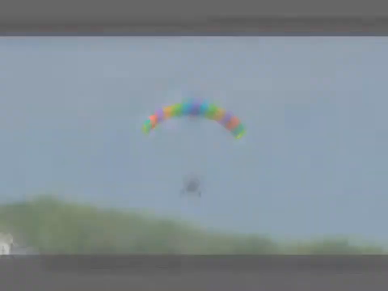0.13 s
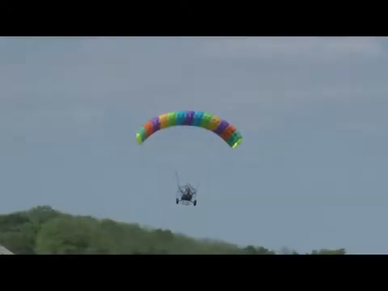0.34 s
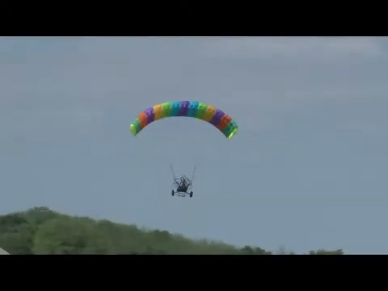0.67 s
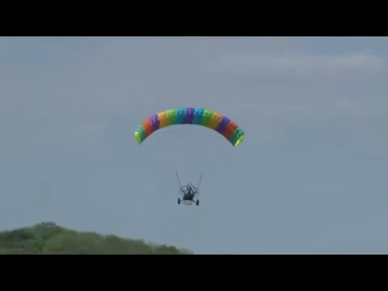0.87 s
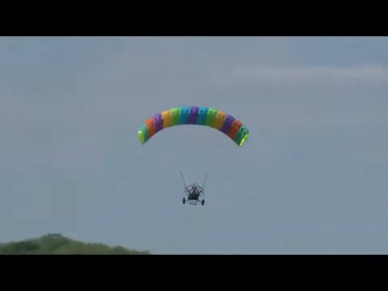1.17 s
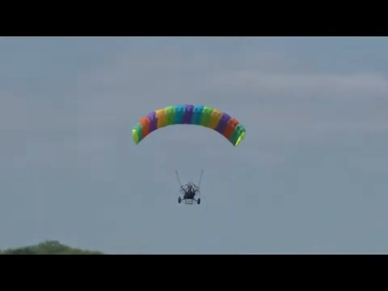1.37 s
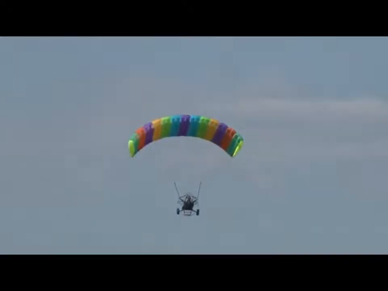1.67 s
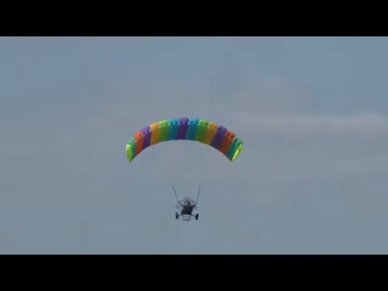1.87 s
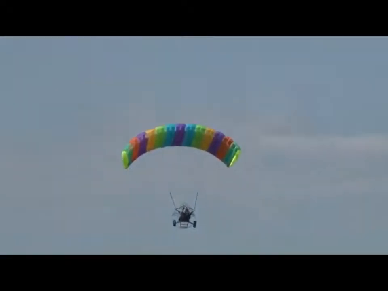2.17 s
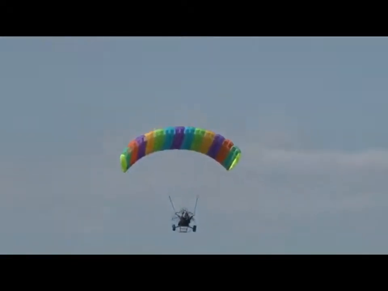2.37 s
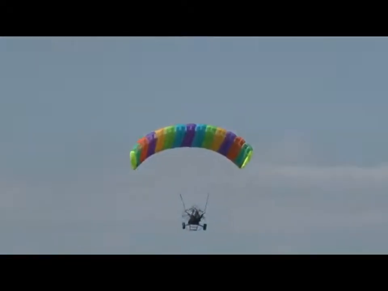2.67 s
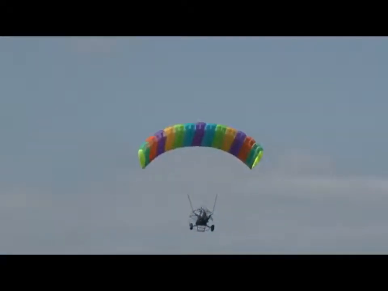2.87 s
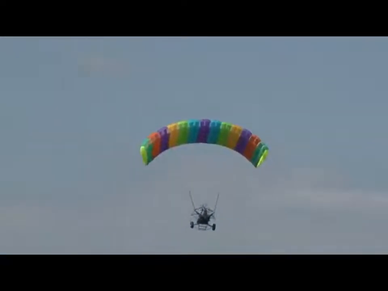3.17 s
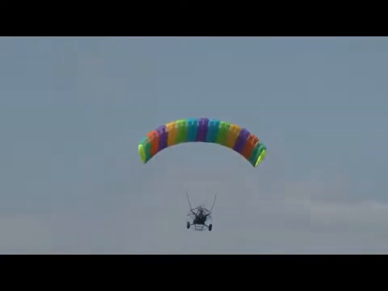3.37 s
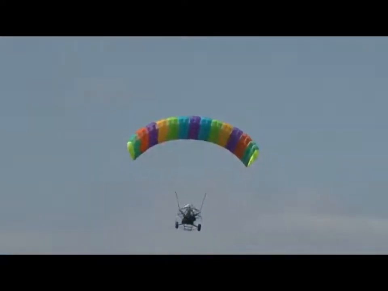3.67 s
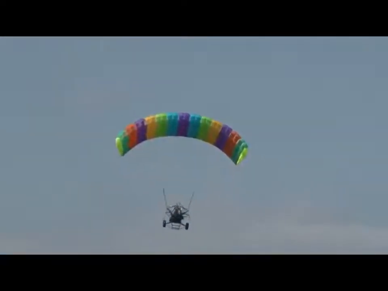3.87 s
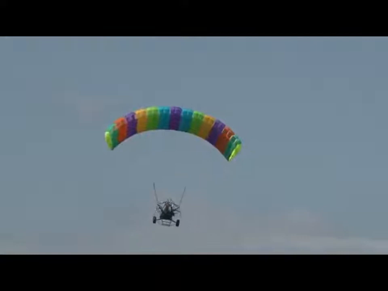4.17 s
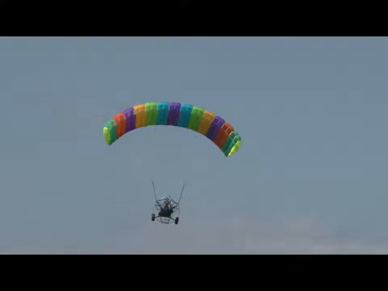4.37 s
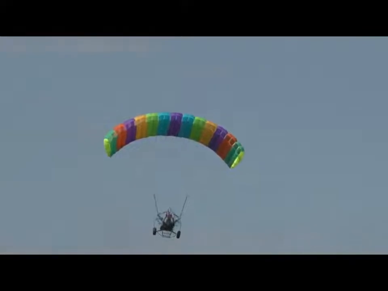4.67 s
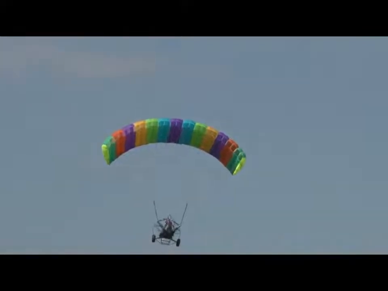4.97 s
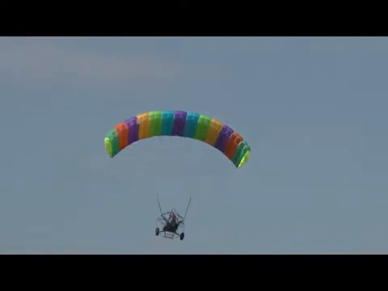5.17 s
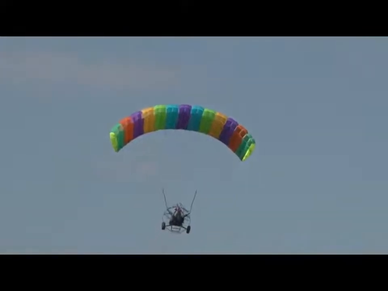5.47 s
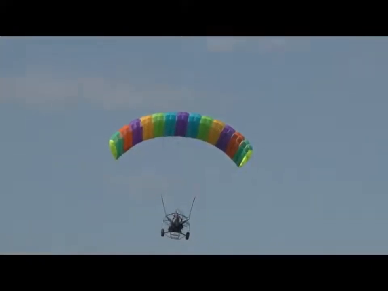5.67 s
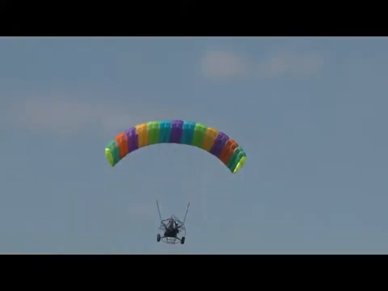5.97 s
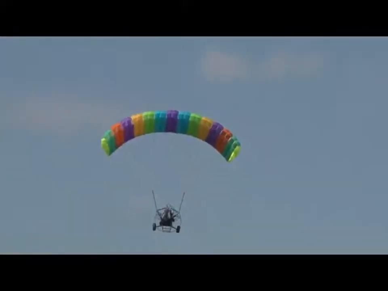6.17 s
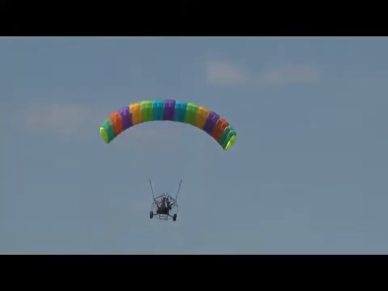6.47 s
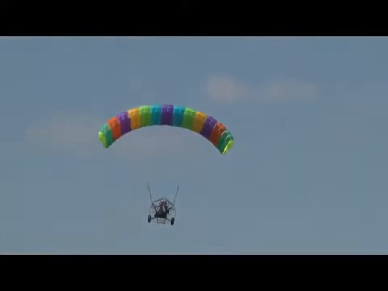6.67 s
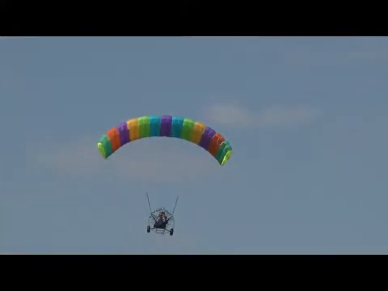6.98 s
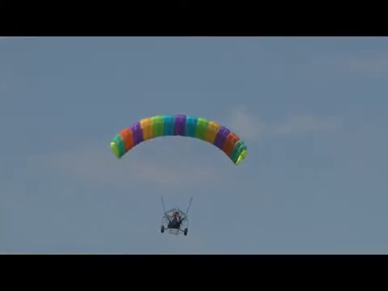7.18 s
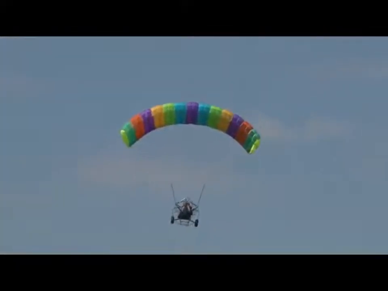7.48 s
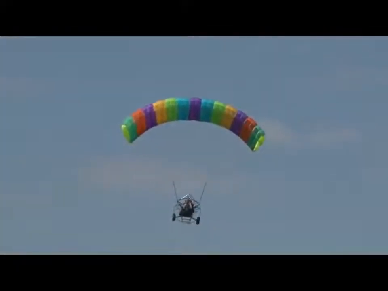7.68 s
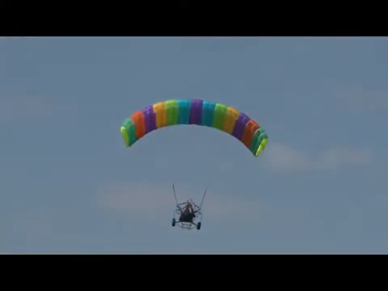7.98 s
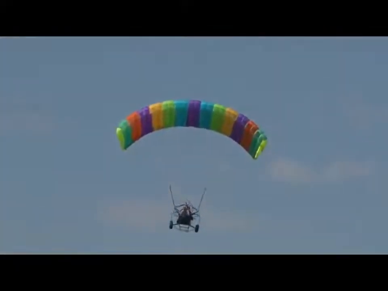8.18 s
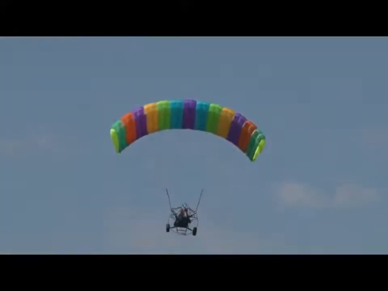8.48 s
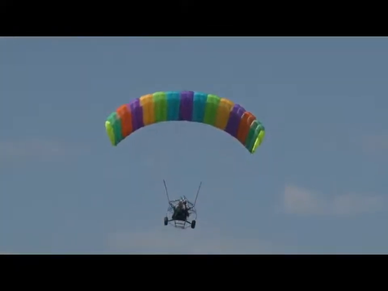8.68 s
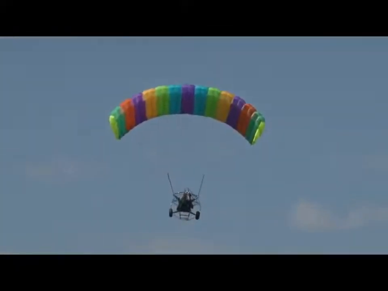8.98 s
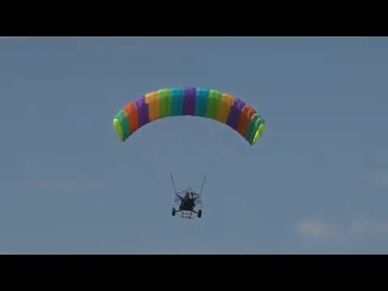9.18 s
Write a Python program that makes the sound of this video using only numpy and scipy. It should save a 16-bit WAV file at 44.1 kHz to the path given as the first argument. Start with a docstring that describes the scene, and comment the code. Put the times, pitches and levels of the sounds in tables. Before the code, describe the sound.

Outdoors, a small aircraft engine and propeller buzz continuously, moderate at first and then fuller as the machine climbs toward the listener. The pitch barely changes, while a raspy rush of air swells and shifts in tone. Four very short, sharp clicks stand out of the drone, the first two close together. A soft wind rumble touches the microphone now and then, mostly on the left.

```python
"""On an open airfield, a powered parachute drones towards the listener and climbs slowly overhead.
Its two-stroke engine radiates harmonics of the firing rate through the exhaust and barks at each firing;
a geared pusher propeller adds blade-passing tones and a rough rush of shed vortices.
Close reflections interfere with the rush in a comb that sinks as the craft rises.
Light gusts rumble on the microphone, and four sharp cracks stand out of the drone."""
import sys
import numpy as np
from scipy import signal
from scipy.fft import rfft, irfft
from scipy.io import wavfile

SR = 44100
rng = np.random.default_rng(int(sys.argv[2]) if len(sys.argv) > 2 else 0)


def master_out(mix):
    """Clip the mix to full scale and print it as 16-bit PCM to the path in sys.argv[1]."""
    frames = np.transpose(np.atleast_2d(mix))
    ceiling = np.clip(frames, -1, 1)
    pcm = np.round(ceiling * 32767).astype(np.int16)
    wavfile.write(sys.argv[1], SR, pcm)


N = 411894
TIME = np.arange(N) / SR
BIN_HZ = np.arange(N // 2 + 1) * SR / N

# firing rate as heard (t/s, f/Hz)
FIRING_RATE = [(0, 130.95), (1.64, 131.0), (2.28, 130.5), (3.08, 129.6), (3.8, 129.12), (4.6, 129.25),
               (6.0, 128.95), (7.2, 129.12), (8.6, 129.8), (9.33, 129.55)]
# level of the propeller tones and lower rush: a quick fade-in, then slow, wavering growth (t/s, gain/dB)
GROWTH = [(0, -11), (.45, -2.5), (1.4, -4), (2.2, -1.5), (3, 0), (4.2, 0.2), (5.4, 0.6), (6.5, 3), (7.4, 3),
          (8.2, 0.5), (9.34, 4)]
# exhaust harmonics 3 to 6 (t/s, relative level/dB)
THIRD_ORDER = [(0.0, -47), (1.53, -48.5), (2.08, -33.5), (2.96, -37), (6.66, -25.5), (7.2, -35),
               (7.44, -31.5), (8.35, -34.5), (9.26, -26.5), (9.34, -37.5)]
FOURTH_ORDER = [(0.0, -40), (0.02, -44), (0.75, -31), (1.48, -33), (1.92, -51), (2.52, -29), (4.08, -22.5),
                (4.97, -34), (5.36, -22.5), (5.82, -20), (6.68, -26.5), (7.88, -20.5), (8.97, -32),
                (9.24, -30), (9.34, -36.5)]
FIFTH_ORDER = [(0.0, -34), (0.44, -28.5), (1.43, -24.5), (2.11, -32), (2.52, -23), (2.99, -23.5),
               (4.21, -16.5), (4.73, -20.5), (5.46, -17.5), (6.71, -18.5), (7.26, -39), (8.61, -30),
               (8.97, -37), (9.34, -28)]
SIXTH_ORDER = [(0.0, -51.5), (0.28, -40.5), (1.48, -42), (2.36, -32.5), (2.78, -42), (3.87, -29.5),
               (4.03, -41.5), (4.27, -27), (4.95, -28), (5.88, -49), (6.61, -31), (7.62, -37.5),
               (7.7, -26.5), (8.3, -40), (8.61, -27), (9.34, -26.5)]
# radiation lobes of the other exhaust harmonics (firing order, level/dB, peak t/s, half-width/s)
EXHAUST_LOBES = [(1, -44, 1.1, 1.1), (1, -42.5, 3.45, 0.41), (1, -44.5, 6.4, 1.6), (2, -47.5, 1.1, 0.62),
                 (2, -39, 3.5, 0.29), (2, -32, 8.3, 2.26), (7, -38, 0.91, 2.7), (7, -25, 3.64, 0.52),
                 (7, -32, 5.9, 1.2), (7, -19.5, 6.75, 0.042), (7, -32, 8.5, 1.9), (8, -39, 1.3, 1.4),
                 (8, -28.5, 4.1, 0.5), (8, -28.5, 5.9, .7), (9, -35, 0.71, 1), (9, -36.5, 3.9, 0.66),
                 (9, -43, 8.2, 0.3), (9, -37, 11, .6), (10, -31.5, 2.7, .3), (10, -28, 3.5, 0.43),
                 (10, -34, 8.55, .35), (11, -37, 0.92, .7), (11, -35, 2.2, 0.72), (11, -36.5, 3.6, 0.63),
                 (11, -34, 6, 1.8), (11, -31.5, 8.15, .25), (12, -31, 4.65, 0.3), (12, -27.5, 7.6, 0.52),
                 (13, -39.5, 1.9, 0.6), (13, -33, 6.3, 0.58), (14, -33.5, 8.5, 0.92),
                 (14, -27.5, 6.62, 0.44), (15, -34.5, 7.2, 0.1)]
# lobes of the strong propeller tones (blade order, relative level/dB, peak t/s, half-width/s)
PROPELLER_LOBES = [(2, -27.5, 8.7, 2), (4, -25, 6.7, 3.7), (6, -29, 4.2, 1.5)]
# weak propeller tones (blade order, level/dB re the mean of the strong ones)
PROPELLER_WEAK = [(1, -19), (3, -15), (5, -12.5), (8, -2)]
# spectral envelope of the in-phase upper firing orders (f/Hz, relative level/dB)
RASP_SPECTRUM = [(1030, -6), (1450, -1.5), (1850, -7.5), (2300, -4), (3100, -5), (3800, -5.5)]
# reflections from three nearby surfaces (t/s, then delay/ms of each)
ECHO_DELAYS = [(0, 0.18, 0.6, 1.62), (2.399, 0.26, 0.4, 1.59), (3.2, 0.46, 0.54, 1.65),
               (4.0, 0.34, 0.72, 1.77), (4.699, 0.62, 1.14, 1.92), (5.4, 0.73, 1.54, 2.19),
               (6.0, 0.73, 1.73, 2.36), (6.6, 0.83, 1.97, 2.1), (7.3, .95, 2.04, 2.49),
               (8.2, 1.02, 2.09, 2.67), (9.34, 1.22, 2, 3.1)]
# their strength (t/s, then relative gain of each)
ECHO_GAINS = [(1.6, 0.27, 0.1, 0.14), (3.2, 0.16, 0.15, 0.11), (5.5, .25, .28, 0.34),
              (7.3, .17, 0.18, 0.37), (9.34, 0.16, 0.45, 0.058)]
# their shift on reflection (phase/rad of each)
ECHO_PHASES = [2.64, -1.5, 0.63]
# hollows and crests in the rush (peak t/s, half-length/s, f/Hz then, fall/(octaves per s), gain/dB)
SWEEPS = [(1.15, .3, 2970, .1, -8), (1.85, .35, 4020, 0, 4.5), (2.0, .4, 3200, 0.088, 7),
          (2.2, .4, 1250, 0, 4), (2.448, .15, 1930, .2, 2), (2.75, .3, 4150, 0.32, 5.5),
          (3.25, .35, 2180, 0.18, -9), (4.8, 0.24, 2460, 0.54, 4.5), (5.253, .25, 3200, 0.58, 2.5),
          (5.498, 0.4, 1550, .35, -4), (5.9, 0.55, 1230, 0.24, -4), (7.1, .6, 1070, .1, -2),
          (7.2, 2.7, 727, 0.069, -7), (8.05, .3, 3350, 0.076, 2.5), (8.4, 0.84, 1340, .25, 5.5)]
# long-term spectrum of the rush (f/Hz, relative density level/dB)
RUSH_SPECTRUM = [(50, -95), (130, -64.5), (200, -67.5), (300, -62), (420, -57), (620, -49.5), (830, -53.5),
                 (1100, -54.5), (1400, -55), (1900, -55.5), (2400, -58), (2950, -63.5), (3250, -64.5),
                 (3600, -70.5), (4150, -69), (4700, -72), (5400, -72), (7300, -77), (8800, -99)]
# band centres of the rush: bass, lower and upper body, upper middle, treble, highest treble (f/Hz)
BAND_CENTRES = [300, 800, 1200, 2200, 5500, 7500]
# swell of the upper middle and of the treble in moving air (t/s, relative level/dB)
UPPER_MID_SWELL = [(0.0, -45.5), (0.44, -37), (1.38, -33), (2.16, -23), (2.55, -27), (2.68, -31),
                   (2.84, -28.5), (3.09, -34.5), (4.03, -28), (5.02, -30.5), (5.17, -33), (6.45, -29),
                   (6.53, -27.5), (7.23, -30.5), (7.75, -25.5), (8.25, -29.5), (8.87, -26), (9.34, -26.5)]
TREBLE_SWELL = [(0.0, -51.5), (0.39, -50), (1.27, -40.5), (1.53, -44.5), (2.0, -36.5), (2.29, -48),
                (2.91, -41), (3.12, -45), (3.87, -44.5), (4.06, -40.5), (4.21, -39), (4.34, -45),
                (5.07, -41.5), (5.1, -38), (5.44, -46.5), (6.35, -44.5), (6.47, -39.5), (7.26, -45),
                (7.7, -33), (7.8, -36.5), (8.35, -45.5), (8.61, -34), (8.74, -39.5), (9.16, -41),
                (9.31, -35.5), (9.34, -39.5)]
# left microphone capsule against the right (f/Hz, level difference/dB, phase lead/rad)
CAPSULES = [(130, 12.0, -1.3), (230, 10.2, -1.1), (390, 8.8, -1.5), (450, 3.3, -1.7), (520, 0.1, -1.3),
            (650, 3.5, -0.8), (780, 3.1, -1.7), (920, -1.7, -1.6), (1200, -2.8, -1.5), (1600, -3.1, -1.2),
            (2100, -1.5, -1.9), (2700, -2.8, -2.3), (3200, -3.4, -2.2), (3600, 5.0, -3.1),
            (4200, -0.6, -3.6), (4700, 2.4, -4.3), (5400, -5.2, -5.5), (6500, -8.3, -6.0),
            (7800, -10.5, -6.5)]
# gusts at the microphone (peak t/s, level/dB, half-length/s)
GUSTS = [(.1, -46, 0.54), (1.35, -37, 0.048), (2.534, -39, 0.08), (3.346, -52, 0.13), (5.9, -42, 0.6),
         (5.894, -37, 0.12), (7.33, -41.5, .1)]
# spectrum of the wind rumble (f/Hz, relative level/dB)
WIND_SPECTRUM = [(10, -10), (25, 0), (55, 2), (85, -1.5), (140, -1.5), (400, -37), (1500, -68)]
# single sharp cracks (t/s, initial envelope level/dB, f/Hz, decay time/ms)
SNAPS = [(1.7605, -4, 1800, .45), (1.8745, -3.5, 1700, .35), (5.1145, -17, 5600, .5),
         (8.1115, -4.5, 1550, 1.0)]


def undb(db):
    """Amplitude ratio of a level in decibels."""
    return 10 ** (np.asarray(db) / 20)


def curves(table):
    """Linear interpolation of each column of a time table, sample by sample."""
    times, *columns = np.transpose(table)
    return [np.interp(TIME, times, column) for column in columns]


def over_hz(hz, points_hz, values):
    """Linear interpolation on a log-frequency axis."""
    return np.interp(np.log(np.maximum(hz, 1)), np.log(points_hz), values)


def colour(x, points):
    """Zero-phase filtering by a table of (f/Hz, gain/dB)."""
    return irfft(rfft(x) * undb(over_hz(BIN_HZ, *np.transpose(points))), N)


def unit(x):
    """Normalisation to rms 1."""
    return x / np.sqrt(np.mean(x ** 2))


def drift(rate_hz):
    """Random fluctuation: low-pass noise of rms 1."""
    return unit(irfft(rfft(rng.standard_normal(N)) / (1 + (BIN_HZ / rate_hz) ** 4), N))


def harmonic(cycles, order, db, flutter_db, wander_rad):
    """Scintillation: turbulence modulates the level and phase of one order of a rotating source."""
    amplitude = np.sqrt(2) * undb(db + flutter_db * drift(12))
    return amplitude * np.cos(2 * np.pi * order * cycles + wander_rad * drift(5))


def lobe(peak_s, width_s):
    """Directivity: the amplitude rises and falls as a radiation lobe sweeps over the listener."""
    return 1 / (1 + ((TIME - peak_s) / width_s) ** 2)


def exhaust(firings):
    """Periodic firing gives a harmonic series; the ringing exhaust pipe spreads its phases."""
    levels = [(3, curves(THIRD_ORDER)[0] + 2.3), (4, curves(FOURTH_ORDER)[0] + 1.9),
              (5, curves(FIFTH_ORDER)[0] + .5), (6, curves(SIXTH_ORDER)[0] + 2.3)]
    power = {}
    for order, db, peak_s, width_s in EXHAUST_LOBES:
        power[order] = power.get(order, 0) + (undb(db) * lobe(peak_s, width_s)) ** 2
    levels += [(order, 10 * np.log10(p)) for order, p in power.items()]
    return sum(harmonic(firings + rng.random(), k, db, flutter_db=.92 + .15 * k, wander_rad=.023 * k)
               for k, db in levels)


def propeller(blade_passes, lobe_floor=.038):
    """Rotational noise: harmonics of the blade-passing rate, with most power in the even orders."""
    growth_db = curves(GROWTH)[0]
    levels = {k: db + growth_db + 20 * np.log10(lobe_floor + (1 - lobe_floor) * lobe(peak_s, width_s))
              for k, db, peak_s, width_s in PROPELLER_LOBES}
    strong = sum(harmonic(blade_passes, k, db, flutter_db=.46, wander_rad=.22)
                 for k, db in levels.items())
    mean_db = np.mean(list(levels.values()), axis=0)
    weak = sum(harmonic(blade_passes, k, mean_db + db, flutter_db=4, wander_rad=.33)
               for k, db in PROPELLER_WEAK)
    return strong + weak


def puffs(cycles, decay_cycles, scatter_db):
    """Pulse-modulated noise: one decaying burst a cycle, of random strength in each of three bands."""
    envelope = np.exp(-(cycles % 1) / decay_cycles)
    spectrum = 0
    for low_hz, high_hz in [(0, 1300), (1300, 2800), (2800, 12000)]:
        strength = undb(scatter_db * rng.uniform(-1, 1, N // 100))
        bursts = unit(rng.standard_normal(N) * strength[cycles.astype(int)] * envelope)
        spectrum = spectrum + rfft(bursts) * (BIN_HZ >= low_hz) * (BIN_HZ < high_hz)
    return irfft(spectrum, N)


def bark(firings):
    """Impulsive discharge: each firing gives a crack, a weaker one half a cycle on and a gasp of gas."""
    first, second = (puffs(firings + lag, decay_cycles=.055, scatter_db=3) for lag in (0, .5))
    crack = unit(first + undb(-4.5) * second)
    crack = colour(crack, [(400, -1), (1000, -5), (2600, -1), (4500, -2), (7500, -8)])
    gas = puffs(firings, decay_cycles=.73, scatter_db=9)
    return undb(-5.5) * crack + undb(-10) * gas


def propeller_wash(blade_passes):
    """Vortex shedding: each blade leaves a burst of noise over the steady hiss of the wake."""
    vortices = colour(puffs(blade_passes, decay_cycles=.64, scatter_db=2.5), [(2000, 2), (5000, -6)])
    wake = rng.standard_normal(N)
    return undb(-6) * vortices + undb(-7) * wake


def rasp(firings, odd_order_db=-1):
    """Coherent superposition: the upper firing orders stay in step and add up to sharp pulses."""
    orders = np.arange(8, 29)
    mean_firing_hz = firings[-1] / TIME[-1]
    levels = over_hz(orders * mean_firing_hz, *np.transpose(RASP_SPECTRUM))
    levels += odd_order_db * (orders % 2)  # two pulses a cycle favour the even orders
    pulses = sum(harmonic(firings, k, db, flutter_db=3.5, wander_rad=.15)
                 for k, db in zip(orders, levels))
    strength = 1 + .55 * rng.uniform(-1, 1, N // 100)  # no two firings are equally strong
    return pulses * strength[np.round(firings).astype(int)]


def reflections(x):
    """Comb filtering: three delayed copies interfere; the notches sink as the climb lengthens the lags."""
    gains = np.array(curves(ECHO_GAINS))
    # rough surfaces return less of the treble
    dull = signal.hilbert(colour(x, [(1500, 0), (3000, -2), (6000, -10)]))
    echoes = sum(gain * np.exp(1j * phase) * np.interp(TIME - delay_ms / 1000, TIME, dull)
                 for gain, phase, delay_ms in zip(gains, ECHO_PHASES, curves(ECHO_DELAYS)))
    return (x + echoes.real) / np.sqrt(1 + np.sum(gains ** 2, axis=0) / 2)


def flyover_phasing(x, width_octaves=.12):
    """Phasing of a fly-over: narrow bands of the rush fade or swell, most of them gliding down."""
    frames = dict(fs=SR, nperseg=2048, noverlap=1536)
    hz, t, spectra = signal.stft(x, **frames)
    gain_db = 0
    for peak_s, length_s, centre_hz, fall, db in SWEEPS:
        octaves = np.log2(np.maximum(hz, 1) / centre_hz)[:, None] + fall * (t - peak_s)
        gain_db = gain_db + db * np.exp(-(octaves / width_octaves) ** 2 - ((t - peak_s) / length_s) ** 2)
    return signal.istft(spectra * undb(gain_db), **frames)[1][:N]


def shape_rush(x, bass_growth=1.35, top_rise_db_per_s=1):
    """Spectral shaping of the rush: low bands fade in and grow, high bands swell in moving air."""
    spectrum = rfft(x) * undb(over_hz(BIN_HZ, *np.transpose(RUSH_SPECTRUM))) * np.sqrt(SR / 2)
    body_db = curves(GROWTH)[0]
    upper_db, treble_db = (db - db.mean() + .15 for db in curves(UPPER_MID_SWELL) + curves(TREBLE_SWELL))
    # the highest treble grows steadily brighter
    top_db = treble_db + top_rise_db_per_s * (TIME - TIME.mean())
    swells_db = [bass_growth * body_db, body_db, body_db, upper_db, treble_db, top_db]
    bands = (irfft(spectrum * over_hz(BIN_HZ, BAND_CENTRES, share), N)
             for share in np.eye(len(BAND_CENTRES)))
    return sum(band * undb(db) for band, db in zip(bands, swells_db))


def field_scatter():
    """Diffuse scattering: a little rush returns from all over the field, uncorrelated left and right."""
    noise = rng.standard_normal((2, N))
    return shape_rush(colour(noise, [(200, -17), (1000, -16.5), (3500, -3.5), (7000, -20)]))


def capsules(x):
    """Spaced reception: a distant source reaches the two capsules with a different gain and phase."""
    hz, balance_db, lead_rad = np.transpose(CAPSULES)
    left = undb(over_hz(BIN_HZ, hz, balance_db) / 2) * np.exp(.5j * over_hz(BIN_HZ, hz, lead_rad))
    pair = np.array([left, 1 / left])
    return irfft(rfft(x) * pair / np.sqrt(np.mean(abs(pair) ** 2, axis=0)), N)


def wind(breeze_db=-51, right_db=-26):
    """Flow noise: gusts over a light breeze rumble on each capsule separately, mostly on the left."""
    gusts = sum(undb(db) * np.exp(-((TIME - peak_s) / length_s) ** 2) for peak_s, db, length_s in GUSTS)
    force = undb(breeze_db) + gusts
    return np.array([unit(colour(rng.standard_normal(N), WIND_SPECTRUM)) * force * gain
                     for gain in (1, undb(right_db))])


def snaps():
    """Damped oscillation: each sharp crack rings for only a few cycles."""
    cracks = 0
    for start_s, db, hz, decay_ms in SNAPS:
        age = np.maximum(TIME - start_s, 0)
        envelope = undb(db) * np.exp(-np.minimum(1000 * age / decay_ms, 50))
        cracks = cracks + envelope * np.sin(2 * np.pi * hz * age)
    return cracks


def scene(blades_per_firing=.8735, fade_in_s=.01):
    """Superposition: the tones and rush of engine and propeller, geared together, meet the wind."""
    firings = np.cumsum(curves(FIRING_RATE)[0]) / SR  # phase in cycles
    blade_passes = blades_per_firing * firings
    tones = exhaust(firings) + propeller(blade_passes)
    rush = bark(firings) + propeller_wash(blade_passes) + undb(-23) * rasp(firings)
    distant_rush = shape_rush(flyover_phasing(reflections(rush)))
    direct = tones + undb(-1.5) * distant_rush + snaps()
    return (capsules(direct) + field_scatter() + wind()) * np.minimum(TIME / fade_in_s, 1)


def record(dry, full_scale=.93, cutoff_hz=8700):
    """Saturation and band limiting: the rare highest peak is clipped and the top is cut steeply."""
    low_pass = signal.ellip(10, .2, 80, cutoff_hz, fs=SR, output="sos")
    return signal.sosfilt(low_pass, np.clip(dry, -full_scale, full_scale))


dry = scene()
out = record(dry)
master_out(out)
```